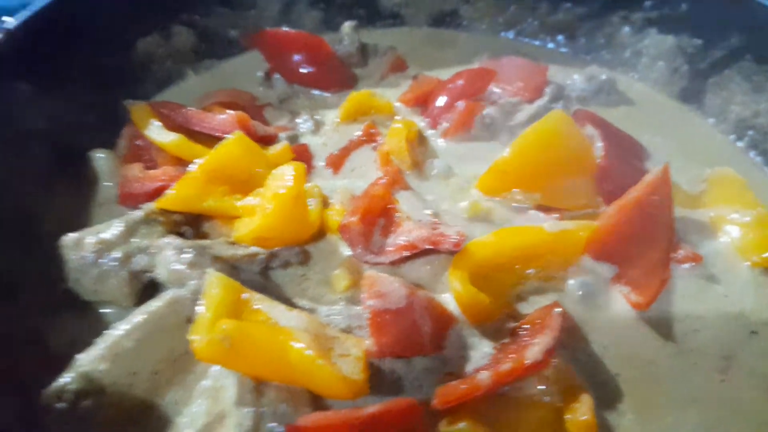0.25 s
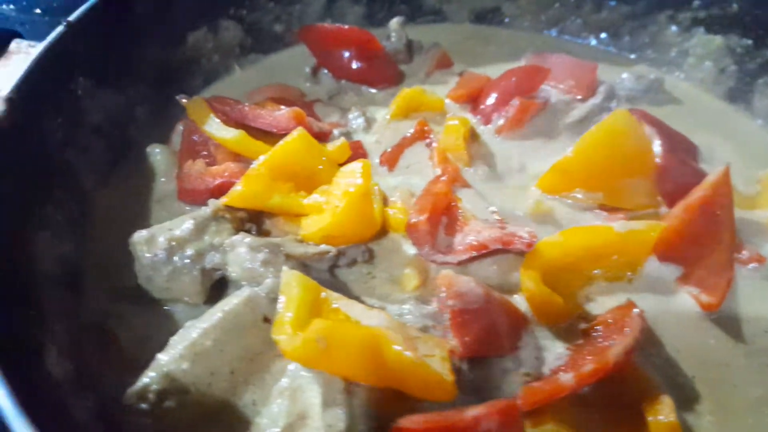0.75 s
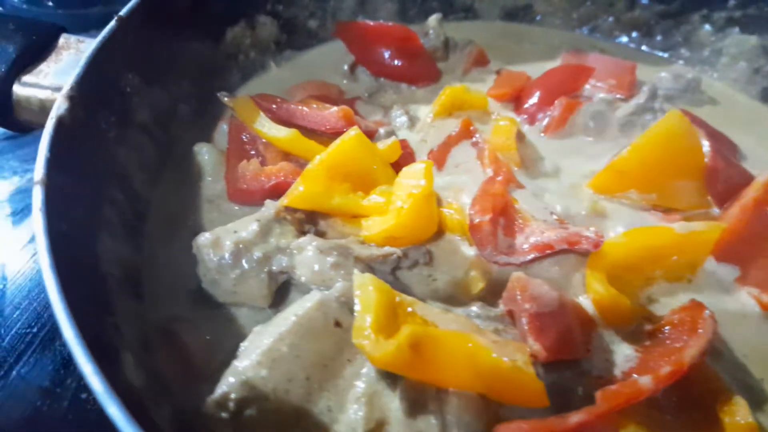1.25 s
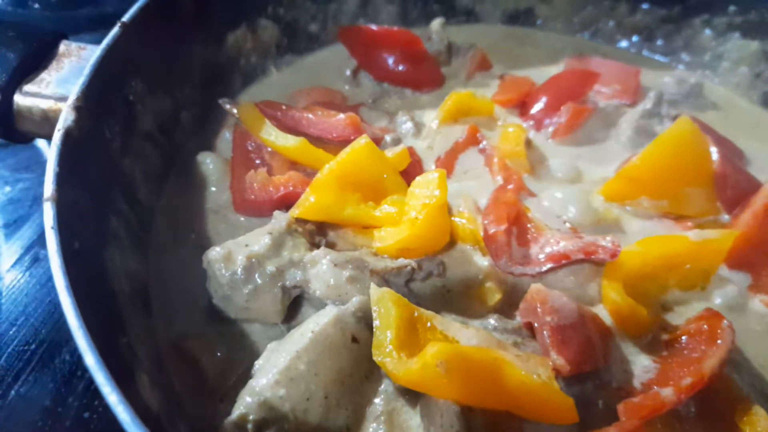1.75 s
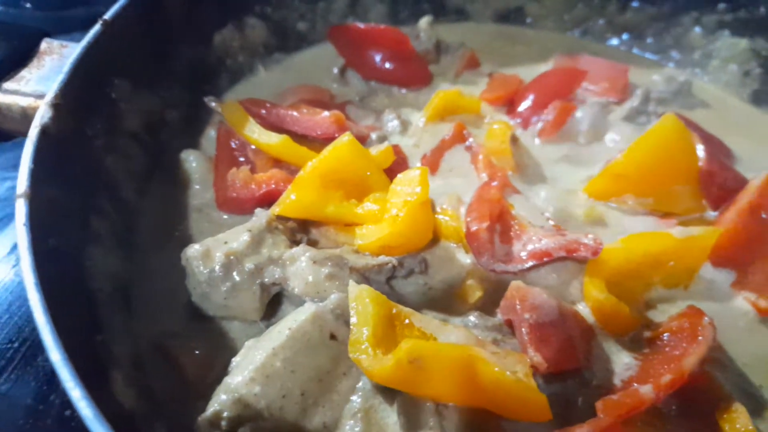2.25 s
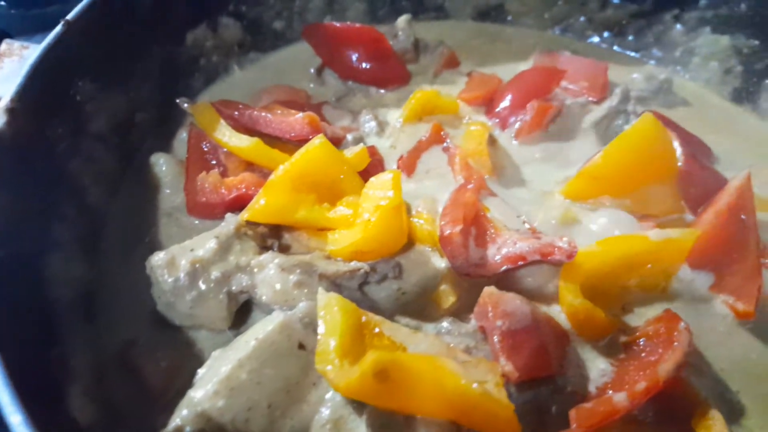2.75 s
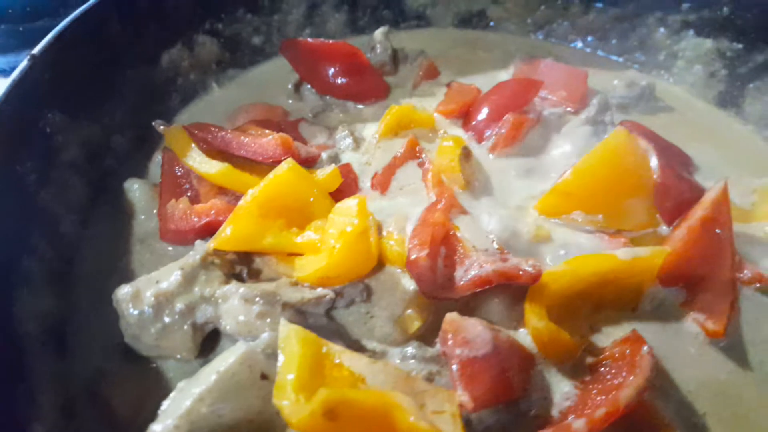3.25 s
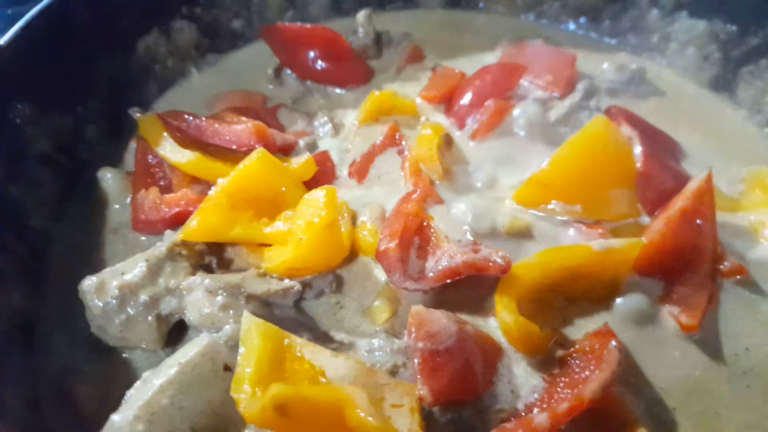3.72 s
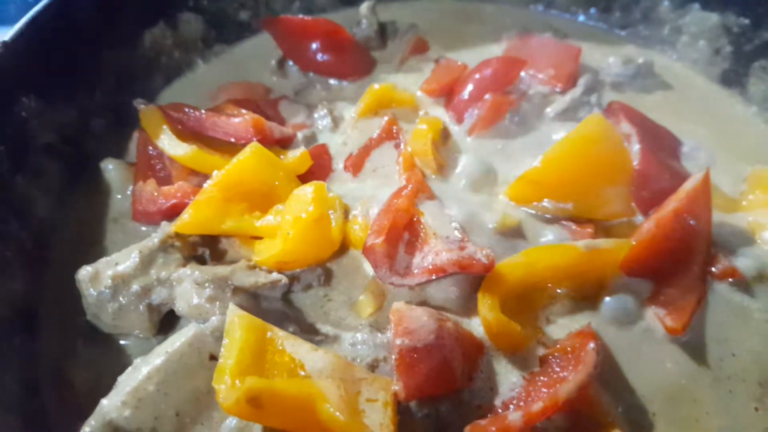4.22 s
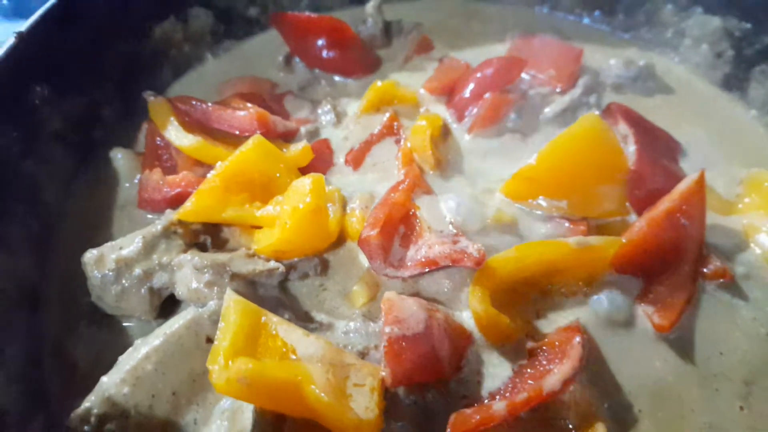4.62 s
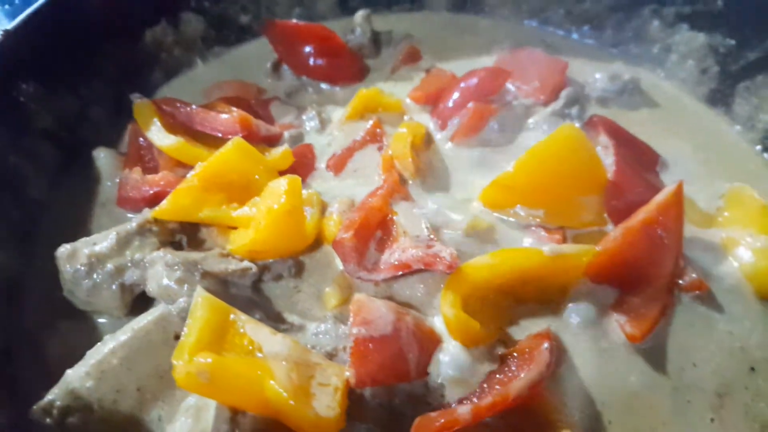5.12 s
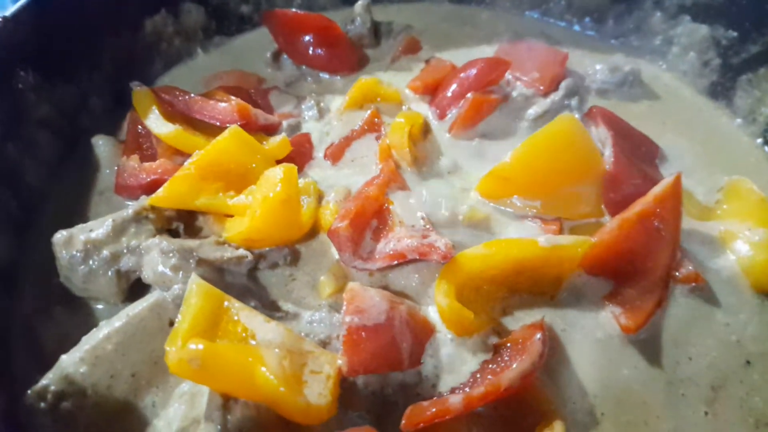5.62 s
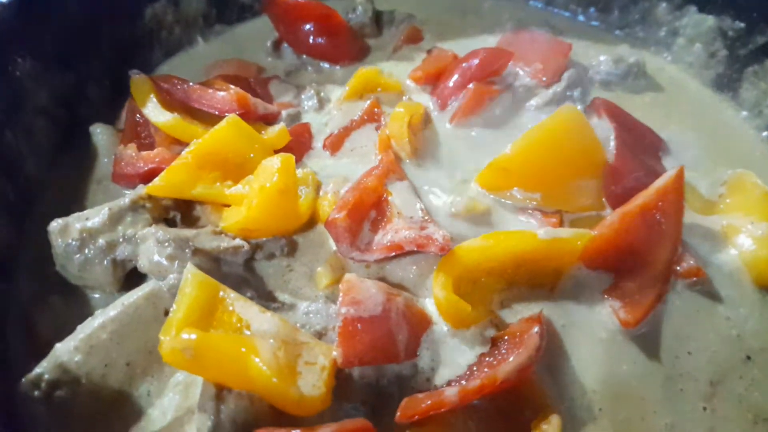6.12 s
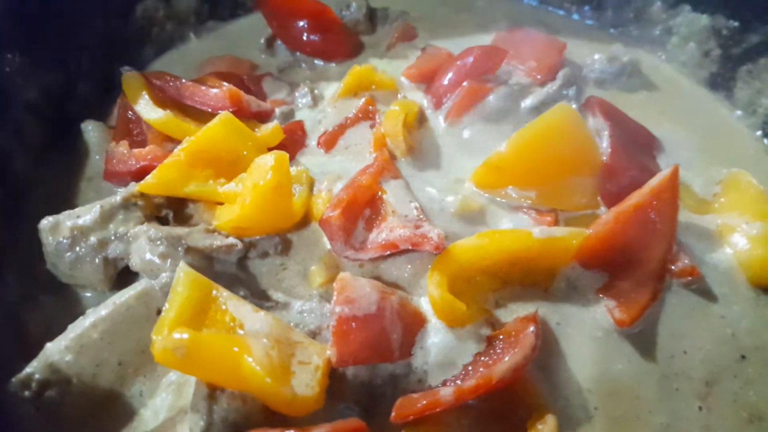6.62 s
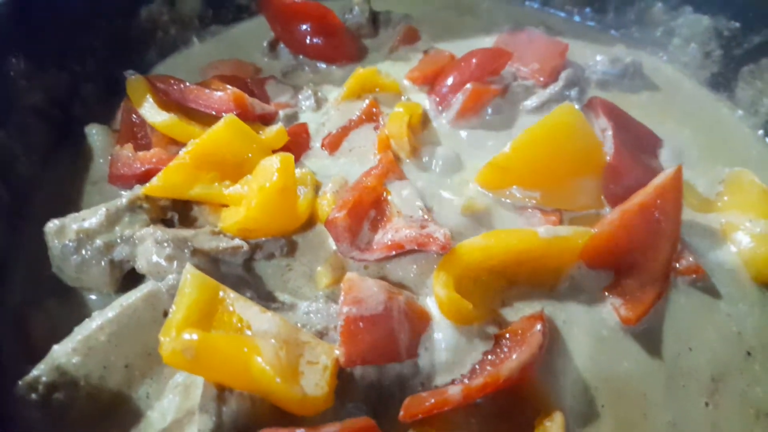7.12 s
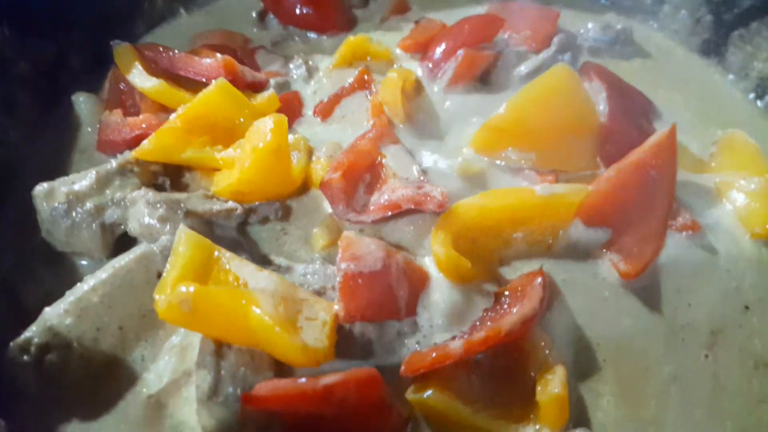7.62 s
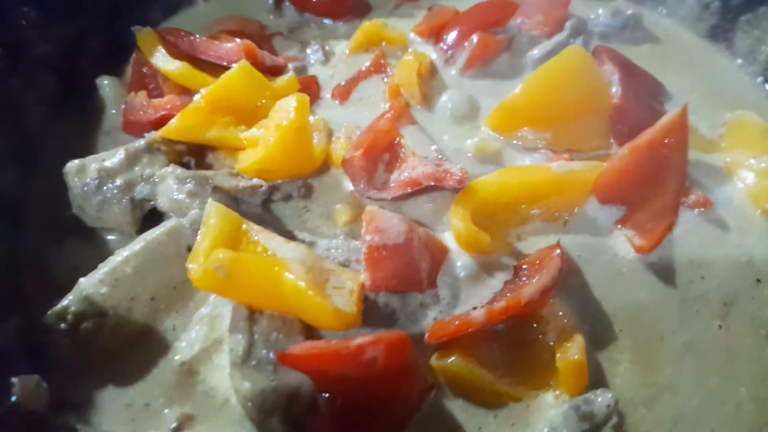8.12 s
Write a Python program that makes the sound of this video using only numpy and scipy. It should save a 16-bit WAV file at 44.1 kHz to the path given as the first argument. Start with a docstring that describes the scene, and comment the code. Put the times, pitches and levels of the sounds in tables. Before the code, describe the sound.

A creamy sauce simmers in a frying pan, heard up close in a small kitchen. Small bubbles keep opening with short wet pops, mixed with sharp little spits, sputtering foam and a faint sizzle from the rim. One pop stands out early on. In the second half, larger bubbles gurgle softly under the surface and a few tiny squelches slip out. The stove hums low throughout.

```python
"""A creamy sauce simmers in a frying pan, heard up close in a small kitchen.
From the start the stove hums and the rim sizzles, while steam bubbles open with short pitched pops,
films of sauce snap and patches of foam collapse in wet sputters. The biggest pop lands near 1.9 s.
From about 5 s big bubbles gurgle under the surface, and between 5.7 and 7.1 s three steam pockets squelch.
All along, pan wall and kitchen throw the sauce back, and two microphone ports colour it differently."""
import sys
import numpy as np
from scipy import signal
from scipy.fft import rfft, irfft
from scipy.io import wavfile
from scipy.ndimage import uniform_filter1d

SR = 44100
rng = np.random.default_rng(int(sys.argv[2]) if len(sys.argv) > 2 else 0)


def put_to_file(sound):
    """Save the sound as 16-bit audio at rate SR, in the file named by the first command-line argument."""
    columns = np.atleast_2d(sound).T  # one column per channel
    safe = np.clip(columns, -1, 1)
    whole_steps = np.round(safe * 32767)
    wavfile.write(sys.argv[1], SR, whole_steps.astype(np.int16))


N = 369111
TIME = np.arange(N) / SR
HZ = np.fft.rfftfreq(N, 1 / SR)

# Films snapping and droplets spitting on hot metal.
# Each row: start in seconds, relative level in dB, pitch in Hz.
FILM_SNAPS = [(0.1796, -37, 3700), (0.2152, -29, 8700), (0.756, -40.5, 4200), (1.234, -32.5, 3170),
              (1.4218, -34, 4020), (1.7091, -26.5, 4440), (1.8629, -36, 4230), (1.9987, -38, 9000),
              (2.1484, -40, 8850), (2.164, -37, 4900), (2.205, -44, 6600), (2.3017, -36, 7060),
              (2.3134, -35, 8100), (2.463, -34.5, 7700), (2.597, -37, 10500), (2.6015, -38, 11000),
              (2.753, -40, 3650), (2.9376, -32.5, 3000), (2.9617, -32, 9100), (3.0942, -40.5, 4660),
              (3.146, -38, 4170), (3.3003, -35, 3600), (3.518, -37, 6340), (3.6036, -30, 4600),
              (3.8328, -26.5, 8500), (3.957, -35, 4020), (3.966, -34.5, 9100), (4.2238, -31, 6650),
              (4.309, -34, 3030), (4.3275, -36, 3640), (4.3814, -35.5, 5500), (4.4078, -33, 4000),
              (4.5974, -32, 4070), (4.7367, -26.5, 4600), (4.92, -42, 6900), (5.003, -29.5, 4000),
              (5.1217, -24.5, 3830), (5.1316, -35, 8000), (5.1362, -29, 5500), (5.3446, -34.5, 8100),
              (5.4156, -37, 2750), (5.423, -40, 4300), (5.487, -40.5, 3600), (5.639, -35, 3700),
              (5.755, -32, 2490), (5.805, -31.5, 2470), (6.054, -30.5, 5350), (6.381, -32.5, 8500),
              (6.636, -39.5, 8500), (6.9132, -28, 3680), (6.9226, -28.5, 3900), (6.9484, -36, 8600),
              (6.977, -34.5, 4040), (7.028, -38, 7460), (7.0946, -32, 3780), (7.1275, -32, 3530),
              (7.233, -35.5, 8200), (7.3804, -36, 3080), (7.6855, -36.5, 7500), (7.698, -38, 3500),
              (7.717, -27.5, 3870), (7.8216, -29.5, 2830), (7.857, -28, 6340), (8.155, -36, 6350),
              (8.175, -29.5, 7500), (8.2352, -37, 3350)]
# Patches of foam collapsing.
# Each row: midpoint in seconds, relative level in dB, typical cell pitch in Hz.
FOAM_PATCHES = [(0.365, -34.5, 2660), (0.399, -36.5, 2800), (0.498, -37, 3230), (0.547, -41, 2840),
                (0.721, -37, 2900), (0.852, -32.5, 2800), (0.968, -34.5, 2070), (1.124, -36, 2880),
                (1.258, -37, 2380), (1.422, -35, 3000), (1.509, -38, 3100), (1.644, -37, 2740),
                (1.792, -36, 3200), (1.93, -32.5, 2250), (2.093, -35.5, 2130), (2.141, -38, 1870),
                (2.309, -39, 2400), (2.408, -39, 2700), (2.455, -37, 2170), (2.558, -36.5, 1770),
                (2.79, -32.5, 3060), (3.177, -39, 1730), (3.302, -38, 2850), (3.517, -36.5, 2400),
                (4.316, -31.5, 2760), (4.386, -44, 3500), (4.744, -35.5, 3450), (5.134, -37, 3320),
                (5.218, -39, 1800), (5.256, -37.5, 3040), (5.424, -37, 2670), (5.527, -41, 3000),
                (5.742, -34.5, 2580), (5.81, -42, 1500), (5.853, -38, 3750), (6.261, -36, 2400),
                (6.476, -37, 3200), (6.927, -43, 3270), (6.978, -37.5, 2300), (7.267, -40, 2730),
                (7.31, -35.5, 2500), (7.357, -33, 2400), (7.532, -39.5, 2120), (7.572, -38.5, 1610),
                (7.615, -39.5, 2400), (7.72, -38, 2600), (7.781, -40, 3000), (7.825, -35.5, 2680),
                (8.028, -36, 1970), (8.246, -32, 2170)]
# Finer films tear with more noise and sit further left. Each row: pitch in Hz, noise as a share of
# the ring, leftward pan, top of the noise in Hz, its decay time in seconds.
FILM_VOICES = [(3000, 0.26, 1, 11600, 0.00053), (4300, 0.48, 1.5, 9900, 0.00089),
               (8500, 0.96, 3.5, 21000, 0.00079)]


def gain_of(db):
    """Decibels to amplitude."""
    return 10 ** (np.asarray(db) / 20)


def unit_rms(x):
    """Scales to rms 1."""
    return x / np.sqrt(np.mean(x ** 2) + 1e-20)


def read(points, hz, column=1):
    """Reads a table on a log-frequency axis."""
    table = np.array(points, float)
    return np.interp(np.log(hz + 1), np.log(table[:, 0] + 1), table[:, column])


def add(mix, s, sound, pan, lag):
    """Places a sound at s seconds; positive pan leans left, and the right hears it lag seconds later."""
    for channel, db_per_pan, at in ((0, .89, s), (1, -1.5, s + lag)):
        part = mix[channel, max(round(at * SR), 0):][:len(sound)]
        part += gain_of(db_per_pan * pan) * sound[:len(part)]


def boil_db(s):
    """How briskly the sauce boils, in dB about its average."""
    # Each row: time in seconds, relative level in dB.
    boil = [(0.0, -42), (0.74, -52), (0.95, -48), (6.45, -43), (6.74, -46.5), (7.78, -41.5), (8.02, -52.5),
            (8.37, -40)]
    at, db = np.transpose(boil)
    return np.interp(s, at, db - db.mean())


def stove(rumble_db=-38, waver_hz=0.19):
    """The bed: a low rumble that rides with the boil, nearly mono, under a few wavering hum tones."""
    # Each row: frequency in Hz, relative noise density in dB.
    rumble_spectrum = [(25, -53), (42, -14.5), (58, -9), (82, -0.5), (98, 0.5), (130, -5.5), (200, -15.5),
                       (265, -7.5), (340, -18), (440, -30.5), (570, -26.5), (900, -34.5), (2000, -46),
                       (6000, -65)]
    # Each row: frequency in Hz, likeness of the two sides from 0 to 1, left over right in dB.
    stereo_image = [(58.3, 0.99, -2.5), (119, 0.98, -1.5), (179, 0.99, -8.5), (239, 1, -2.5),
                    (383, 0.97, -8.5), (640, 0.78, 3), (1410, 0.32, -7.5)]
    # Each row: pitch in Hz, rms level before panning in dB.
    hum_tones = [(59.3, -50.5), (115, -55), (167.5, -54)]
    common, apart = rfft(rng.standard_normal((2, N)))
    likeness = read(stereo_image, HZ)
    pair = np.array([common, likeness * common + np.sqrt(1 - likeness ** 2) * apart])
    rumble = unit_rms(irfft(pair * gain_of(read(rumble_spectrum, HZ)), N))
    bed = gain_of(rumble_db + 0.39 * boil_db(TIME)) * rumble
    for hz, db in hum_tones:
        drift = np.interp(TIME, np.linspace(0, N / SR, 30), rng.standard_normal(30))
        bed += gain_of(db) * np.sqrt(2) * np.sin(2 * np.pi * np.cumsum(hz + waver_hz * drift) / SR)
    balance = gain_of(np.outer([.5, -.5], read(stereo_image, HZ, column=2)))
    return irfft(rfft(bed) * balance, N)


def echoes(x, wall_db=-6, wall_t60=0.036, room_db=-11, size=12000):
    """Quick reflections off the pan wall and hob, then the kitchen's short tail."""
    # Each row: frequency in Hz, seconds to fade by 60 dB.
    kitchen_t60 = [(300, 0.17), (1500, 0.17), (5000, 0.31), (14000, 0.23)]
    t = np.arange(size) / SR
    early, late = rng.choice([-1., 1.], (2, 2, size)) * (rng.random((2, 2, size)) < .12)
    early = early * (t > .0007) * np.exp(-np.log(1000) * t / wall_t60)
    hz, at, bands = signal.stft(late * (t > .005), SR, nperseg=256)
    fade = np.exp(-np.log(1000) * at / read(kitchen_t60, hz)[:, None])
    late = signal.istft(bands * fade, SR, nperseg=256)[1][:, :size]
    response = (gain_of(wall_db) * unit_rms(early) + gain_of(room_db) * unit_rms(late)) / np.sqrt(size)
    return signal.oaconvolve(x, response, axes=1)[:, :N]


def surroundings(x, spots=5, hold=1024):
    """The bursts hop at random between spots, each with its own echoes, and the air in the pan rings."""
    # Each row: resonance in Hz, width in Hz, gain in dB.
    air_modes = [(565.3, 20, 10.5), (639, 58, 4.5), (1073, 22, 0)]
    spot = rng.integers(0, spots, N // hold + 1).repeat(hold)[:N]
    send = x + .5 * x[::-1]
    reflections = sum(echoes(send * uniform_filter1d(1. * (spot == k), 64)) for k in range(spots))
    ring = sum(gain_of(db) * signal.lfilter(*signal.iirpeak(hz, hz / width, SR), x.mean(0))
               for hz, width, db in air_modes)
    return x + reflections + ring


def snap(hz, tear, cycles=2.1, tear_s=0.00039, tear_share=1.18, onset_s=.00008):
    """A film snaps: a tiny cavity rings for a few cycles under a puff of tearing noise."""
    t = np.arange(len(tear)) / SR
    ring = np.sin(2 * np.pi * hz * t) * np.exp(-hz * t / cycles) * (1 - np.exp(-1.8 * hz * t)) ** 2
    return ring + tear_share * tear * np.exp(-t / tear_s) * (1 - np.exp(-t / onset_s))


def crackles(times, level_db, low_hz, high_hz=10000, range_db=17):
    """Tiny snaps at the given times, many faint and a few clear, each hissing around its own pitch."""
    out = np.zeros((2, N))
    tears = rng.standard_normal((len(times), 200))
    for s, tear, (faintness, pitch, place) in zip(times, tears, rng.random((len(times), 3))):
        db = level_db - range_db * np.sqrt(faintness) + .5 * boil_db(s)
        hz = low_hz * (high_hz / low_hz) ** pitch
        tear = signal.lfilter(*signal.iirpeak(hz, 1, SR), tear)
        add(out, s, gain_of(db) * snap(hz, tear), pan=10 * (place - .35), lag=.0005 * (place - .5))
    return out


def rim(count=380):
    """Sauce drying on the hot rim: scattered crackles over a faint hiss."""
    # Each row: frequency in Hz, relative noise density in dB.
    hiss_spectrum = [(300, 20), (700, 11.5), (1500, 4.5), (2400, 9.5), (4500, 4.5), (8000, 5.5), (12000, 4),
                     (16000, 7)]
    # Each row: time in seconds, level in dB.
    hiss_fader = [(0, -49.5), (1.47, -52), (5.6, -49.5), (5.94, -50), (6.85, -49.5), (7.11, -50),
                  (8.37, -49)]
    ticks = crackles(rng.random(count) * N / SR, level_db=-25.5, low_hz=2400)
    hiss = unit_rms(irfft(rfft(rng.standard_normal((2, N))) * gain_of(read(hiss_spectrum, HZ)), N))
    return ticks + hiss * gain_of(np.interp(TIME, *np.transpose(hiss_fader)))


def spray(events, count=3, scatter_s=.012, after_s=.002):
    """Each burst tears the foam beside it: a fizzy tail of crackles, a few hundredths of a second long."""
    bursts = np.array([row[0] for row in events])
    times = bursts[:, None] + after_s + scatter_s * abs(rng.standard_normal((len(bursts), count)))
    return crackles(times.ravel(), level_db=-29, low_hz=3000)


def plip(hz, cycles, glide, swell_cycles):
    """A steam cavity swells into its ring and dies away; the widening hole lifts the pitch by glide."""
    age = np.arange(int((1.3 * cycles + 2) / hz * SR)) / SR * hz  # in cycles
    envelope = (1 - np.exp(-(age / swell_cycles) ** 3)) * np.exp(-np.log(1000) * age / cycles)
    return envelope / envelope.max() * np.sin(2 * np.pi * age * (1 + glide * age / cycles))


def puff(rise_s, size=400):
    """The steam let out of a bubble: a brief push of air, then a shallow suck."""
    age = np.arange(size) / SR / rise_s
    return age * (2 - age) * np.exp(-age)


def gurgle(count=200, range_db=6, low_hz=230, high_hz=330):
    """Big slow bubbles shift beneath the thick sauce with a soft low burble."""
    # Each row: time in seconds, top level in dB.
    gurgle_fader = [(4.7, -62), (4.95, -36), (5.55, -37), (5.9, -51), (6.9, -46.5), (7.3, -35), (8.37, -51)]
    out = np.zeros((2, N))
    for when, faintness, pitch in rng.random((count, 3)):
        s, hz = when * N / SR, low_hz * (high_hz / low_hz) ** pitch
        db = np.interp(s, *np.transpose(gurgle_fader)) - range_db * faintness
        add(out, s, gain_of(db) * plip(hz, cycles=14, glide=0, swell_cycles=3.25), pan=-2, lag=0)
    return out


def small_bubbles(count=340, level_db=-39, range_db=9, low_hz=680, high_hz=2400, cycles=7, puff_db=-2):
    """Little steam bubbles open all over the pan in soft wet blips."""
    out = np.zeros((2, N))
    for when, faintness, pitch, length, place in rng.random((count, 5)):
        s, hz = when * N / SR, low_hz * (high_hz / low_hz) ** pitch
        gain = gain_of(level_db - range_db * np.sqrt(faintness) + 0.29 * boil_db(s))
        pan, lag = 6 * (place - .45), 0.000094 * (place - .5)
        add(out, s, gain * plip(hz, cycles * (.5 + length), glide=0.21, swell_cycles=0.59), pan, lag)
        add(out, s, gain * gain_of(puff_db) * puff(0.11 / hz), pan, lag)
    return out


def steam(hz, spread_s=0.0039, size=2600):
    """Steam fizzes through foam, about an octave above its cells: gives start offset and sound."""
    t = (np.arange(size) - size // 2) / SR
    grains = rng.standard_normal(size) * (rng.random(size) < .1)
    band_hz = [min(hz, 8000), min(3.2 * hz, 16000)]
    fizz = signal.lfilter(*signal.butter(1, band_hz, "band", fs=SR), grains)
    return t[0], unit_rms(fizz) * np.exp(-(t / spread_s) ** 2 / 2)


def foam_cell(hz, cycles=9, glide=0.062, swell_cycles=0.31):
    """A foam cell rings as its cap tears open; the widening hole lifts the pitch."""
    t60 = cycles / hz
    t = np.arange(int(1.2 * t60 * SR) + 50) / SR
    turns = hz * (t + glide * t ** 2 / t60)
    attack = 1 - np.exp(-(turns / swell_cycles) ** 2)
    return np.sin(2 * np.pi * turns) * attack * np.exp(-np.log(1000) * t / t60)


def foam_patch(out, s, db, hz, count, scatter_s=.009, range_db=11, tick_db=-13, steam_db=-17.5):
    """Cells give way in a breath of steam, each a ring with a tick; later ones tend to ring higher."""
    offset_s, fizz = steam(hz)
    add(out, s + offset_s, gain_of(db + steam_db) * fizz, pan=1, lag=.0002 * rng.standard_normal())
    for faintness, draw in zip(rng.permutation(count) / count, rng.standard_normal((count, 204))):
        detune, lateness, place, skew = draw[:4]
        pitch = min(hz * 2 ** (0.44 * detune + 0.098 * lateness), 12000)
        at, gain = s + scatter_s * lateness, gain_of(db - range_db * faintness)
        pan, lag = 1 + 2 * place, .00009 * skew
        add(out, at, gain * foam_cell(pitch), pan, lag)
        add(out, at, gain * gain_of(tick_db) * snap(1.7 * pitch, draw[4:]), pan, lag)


def sputters(boost_db=6.5, faint_count=104, faint_db=-34, range_db=6, low_hz=1290, high_hz=3300):
    """Foam collapses in clear wet sputters, and in fainter ones a dozen times a second."""
    out = np.zeros((2, N))
    faint = rng.random((faint_count, 3))
    for s, db, hz in FOAM_PATCHES:
        foam_patch(out, s, db + boost_db, hz, count=10)
    for slot, (when, faintness, pitch) in enumerate(faint):
        s, hz = (slot + when) / faint_count * N / SR, low_hz * (high_hz / low_hz) ** pitch
        foam_patch(out, s, faint_db - range_db * faintness + boil_db(s), hz, count=5)
    return out


def squelches(flutter_s=0.0011, flutter_db=5, wobble=0.12):
    """Steam squeezes out of a shrinking pocket: the pitch climbs and the wet lip flutters roughly."""
    # Each row: start in seconds, length in seconds, level in dB, first and last pitch in Hz.
    pockets = [(5.716, 0.021, -39, 1840, 2200), (6.515, 0.029, -32.5, 1604, 2380),
               (7.097, 0.0376, -37.5, 1504, 2220)]
    out = np.zeros((2, N))
    for s, length, db, first_hz, last_hz in pockets:
        t = np.arange(0, length, 1 / SR)
        lip, waver = (np.interp(t, flutter_s * np.arange(60), rng.standard_normal(60)) for _ in range(2))
        hz = first_hz * (last_hz / first_hz) ** (t / length) * (1 + wobble * waver)
        envelope = np.sin(np.pi * (t / length) ** 0.11)  # sharp attack, long fall
        level = gain_of(db) * unit_rms(gain_of(flutter_db * lip)) * envelope
        add(out, s, level * np.sin(2 * np.pi * np.cumsum(hz) / SR), pan=1, lag=0)
    return out


def tearing(noise, hz):
    """The noise of a tearing film lies around its pitch: dull for thick films, bright for fine ones."""
    band_hz = np.clip([0.47 * hz, max(read(FILM_VOICES, hz, column=3), hz)], 100, 20000)
    return unit_rms(signal.lfilter(*signal.butter(3, band_hz, "band", fs=SR), noise))


def big_snaps(boost_db=11, spread_s=.0001, fizz_db=-19, fizz_s=0.003, size=1100):
    """Sharp spits that cut through the crackle; the film fizzes just before and after it gives."""
    out = np.zeros((2, N))
    t = (np.arange(size) - size // 2) / SR
    for (s, db, hz), draw in zip(FILM_SNAPS, rng.standard_normal((len(FILM_SNAPS), 351))):
        share, pan, tear_s = (read(FILM_VOICES, hz, column) for column in (1, 2, 4))
        lag = spread_s * draw[0]
        crack = snap(hz, tearing(draw[1:], hz), tear_s=tear_s, tear_share=share, onset_s=tear_s / np.pi)
        crack = gain_of(db + boost_db) * unit_rms(crack) / np.sqrt(len(crack) / 5)
        add(out, s, crack, 1.69 * pan, lag)
        tears = rng.standard_normal(size) * (rng.random(size) < .03) * np.exp(-abs(t) / fizz_s)
        add(out, s + t[0], gain_of(fizz_db) * np.convolve(tears, crack), .5 * pan, lag)
    return out


def fluttered(ring, hz, noise, depth_db=2.5):
    """The wet lip of the hole flaps, so the ring grows uneven from cycle to cycle."""
    age = np.arange(len(ring)) / SR * hz
    lip = np.interp(age / 2, np.arange(len(noise)), noise)
    return ring * gain_of(depth_db * lip * np.tanh(age / np.pi))


def lead_in(s, hz, count=3, lead_s=.018, smack_db=-14, climb_octaves=0.89):
    """A swelling bubble pushes the sauce aside with small wet smacks that climb towards its pitch."""
    for early in (np.arange(count) + rng.random(count)) / count:
        smack = plip(hz * 2 ** (-climb_octaves * early), cycles=3, glide=0, swell_cycles=0.61)
        yield s - lead_s * early, gain_of(smack_db) * (1 - early / 2) * smack


def big_bubbles(trim_db=-6, tick_db=-17, puff_db=-4, spread_s=.00007):
    """The lead pops: a wet lead-in, a tick as the cap tears, a puff of steam and a fluttering ring."""
    # Each row: start in seconds, relative level in dB, cavity pitch in Hz, cycles until the ring dies.
    pops = [(0.0172, -29, 1010, 1.9), (0.0607, -26.5, 730, 4.9), (0.0861, -28, 835, 1.9),
            (0.1417, -32, 720, 5.8), (0.1809, -28, 1420, 3.7), (0.2198, -29.5, 1240, 13),
            (0.3032, -36.5, 680, 9), (0.4345, -25.5, 1320, 3.9), (0.4493, -28, 1540, 35),
            (0.6983, -25, 1230, 1.3), (0.8254, -28.5, 1370, 8.2), (0.8986, -28, 1570, 10),
            (0.9526, -28.5, 1020, 3.7), (1.0885, -32.5, 674, 5), (1.2059, -23, 1380, 6.7),
            (1.2519, -28, 1060, 4.6), (1.3974, -32.5, 825, 2.3), (1.7473, -30, 1120, 23),
            (1.8629, -13, 1560, 4.3), (1.9007, -32, 710, 3.8), (1.9287, -34, 1700, 15),
            (1.9983, -30.5, 990, 8), (2.1469, -23.5, 2500, 16), (2.2956, -33, 1060, 14),
            (2.3844, -24, 1740, 12), (2.4285, -23.5, 975, 7.8), (2.4512, -29, 1730, 11),
            (2.5503, -27.5, 990, 2.4), (2.7132, -32.5, 670, 14), (2.8186, -31, 820, 2.8),
            (3.0938, -27, 840, 4.1), (3.1691, -27, 1120, 1.8), (3.356, -34.5, 1060, 8.3),
            (3.373, -29.5, 1260, 2.4), (3.48, -33, 1260, 3.6), (3.6123, -24, 1570, 13),
            (3.6696, -32, 674, 3.8), (3.7327, -32, 850, 8.8), (3.7405, -27, 2580, 16),
            (3.776, -30.5, 1130, 14), (4.0805, -29.5, 1400, 16), (4.3423, -32, 870, 15),
            (4.4635, -32.5, 1500, 25), (4.7196, -26, 1470, 14), (4.8027, -33, 880, 12),
            (4.9013, -33.5, 670, 8), (4.9321, -24.5, 770, 7), (5.0052, -29.5, 810, 3.2),
            (5.0937, -27.5, 1230, 8.9), (5.14, -19.5, 2680, 11), (5.2242, -27, 1150, 7.2),
            (5.2932, -31, 630, 1.8), (5.3208, -25.5, 1030, 2.2), (5.449, -24, 1530, 19),
            (5.5297, -31, 1290, 9), (5.5967, -28.5, 970, 6.3), (5.7066, -30, 940, 6.9),
            (5.7534, -26.5, 1160, 2.9), (5.789, -24, 1250, 2.8), (5.8036, -28, 915, 8.1),
            (5.8916, -28, 1420, 3.1), (6.012, -36, 980, 14), (6.0323, -32, 1370, 20),
            (6.319, -25, 1110, 1.7), (6.336, -27, 1350, 10), (6.4302, -28, 720, 1.7),
            (6.4815, -28, 1210, 3.5), (6.5154, -24.5, 1510, 12), (6.6746, -35, 605, 8.7),
            (6.6765, -28.5, 1370, 11), (6.707, -28, 1720, 9.1), (6.8982, -28, 1390, 10),
            (7.0977, -48, 1560, 12), (7.338, -28, 1500, 4), (7.5724, -27, 1110, 2.6),
            (7.6589, -30.5, 1220, 19), (7.7001, -28, 1480, 3.8), (7.8214, -32, 2450, 13),
            (7.9075, -26.5, 895, 2.5), (7.9806, -34.5, 1070, 19), (8.0301, -27, 1170, 5.4),
            (8.2364, -33, 1490, 3.6), (8.2543, -36, 1620, 19), (8.362, -31, 640, 7.4)]
    out = np.zeros((2, N))
    for (s, db, hz, cycles), draw in zip(pops, rng.standard_normal((len(pops), 203))):
        place, skew, bend, noise = *draw[:3], draw[3:]
        pan, lag = 1 + 0.7 * place, spread_s * skew
        gain = gain_of(db + trim_db)
        ring = plip(hz, cycles, glide=0.15 * (1 + 0.42 * bend), swell_cycles=0.52)
        add(out, s, gain * fluttered(ring, hz, noise), pan, lag)
        add(out, s + 0.58 / hz, -gain * gain_of(puff_db) * puff(0.66 / hz), pan, lag)
        add(out, s, gain * gain_of(tick_db) * snap(hz, noise), pan, lag)
        for at, smack in lead_in(s, hz):
            add(out, at, gain * min(cycles / 10, 1) * smack, pan, lag)
    return out


def scene():
    """The simmering pan over the stove's hum."""
    sauce = big_bubbles() + squelches() + big_snaps() + sputters()
    sauce += small_bubbles() + gurgle() + spray(FOAM_PATCHES + FILM_SNAPS) + rim()
    # bubbles this small radiate no deep bass
    sauce = signal.sosfilt(signal.butter(2, 170, "high", fs=SR, output="sos"), sauce)
    return surroundings(sauce) + stove()


def port(colour, size=4096):
    """The minimum-phase ringing of one microphone port."""
    log_gain = np.log(gain_of(read(colour, abs(np.fft.fftfreq(size, 1 / SR)))))
    return np.fft.ifft(np.exp(np.conj(signal.hilbert(log_gain)))).real[:size // 2]


def record(dry):
    """Each microphone port adds its own resonances; a steep low-pass takes off the very top."""
    # Each row, for either port: frequency in Hz, gain in dB.
    left_colour = [(300, 1), (420, 1), (680, 4), (1090, 7.5), (1250, 2), (1650, 7.5), (2100, -3), (3100, 3),
                   (4500, -0.5), (6000, -3.5), (8000, -1), (8950, 0.5), (10200, -13), (15700, -13.5)]
    right_colour = [(350, -0.5), (750, 5), (1200, 4.5), (1750, 4.5), (2500, -1.5), (4000, 3.5), (5400, 4.5),
                    (7700, -1.5), (8800, -9), (10200, -9), (11600, -1), (13200, -1), (14600, -3),
                    (15400, -16)]
    heard = signal.oaconvolve(dry, np.array([port(left_colour), port(right_colour)]), axes=1)[:, :N]
    low_pass = signal.firwin(511, 15900, window=("kaiser", 9), fs=SR)
    return signal.oaconvolve(heard, low_pass[None], "same", axes=1)


dry = scene()
out = record(dry)
put_to_file(out)
```